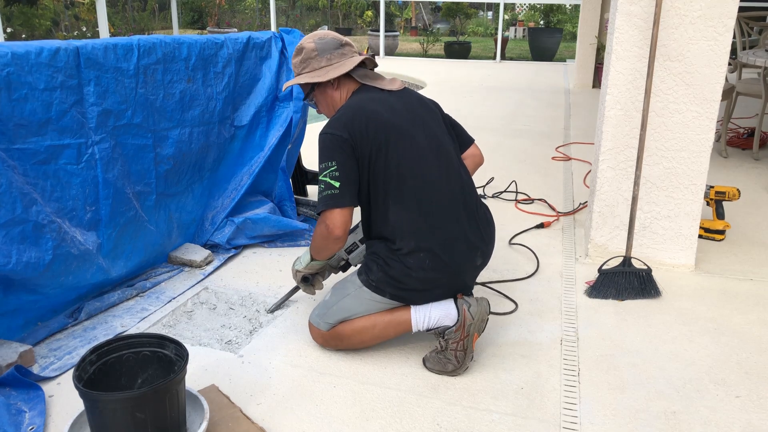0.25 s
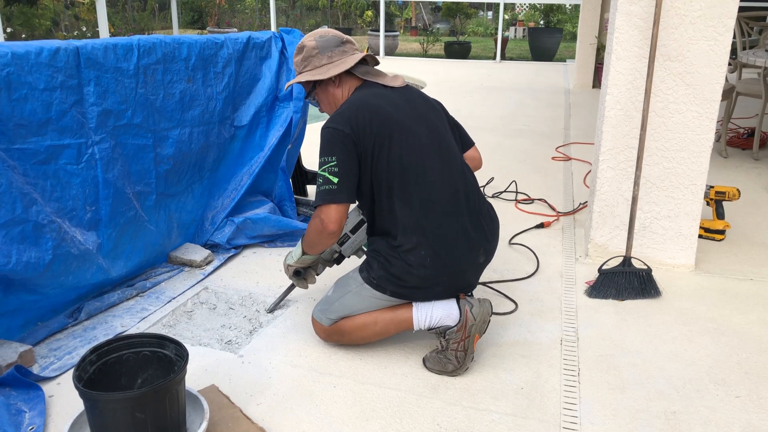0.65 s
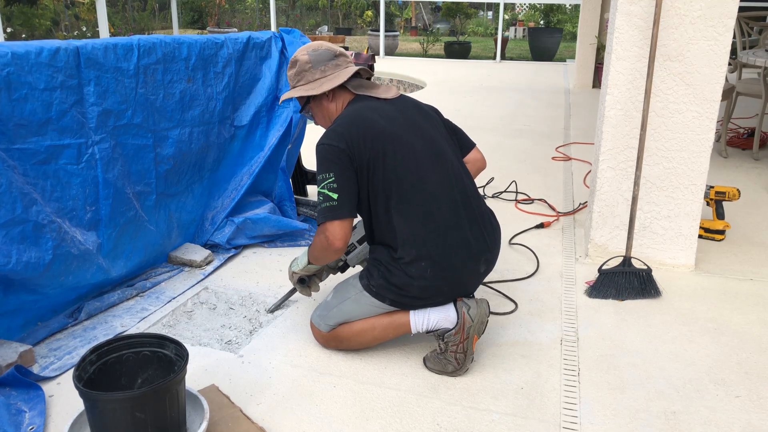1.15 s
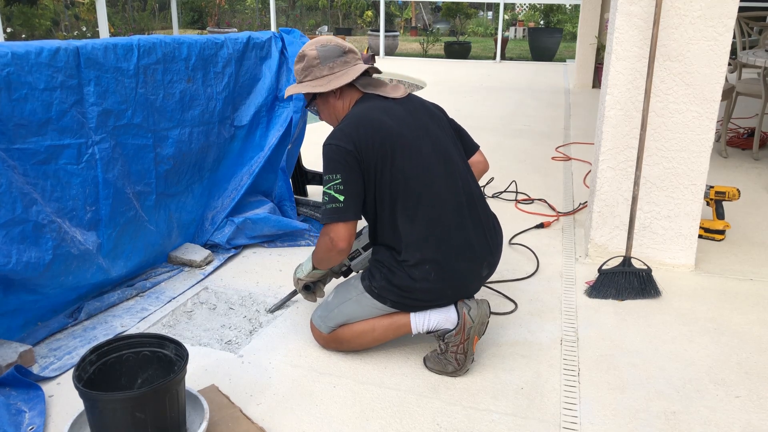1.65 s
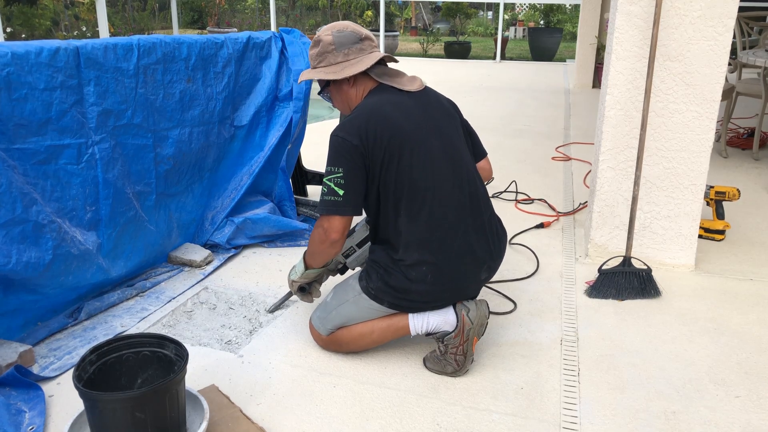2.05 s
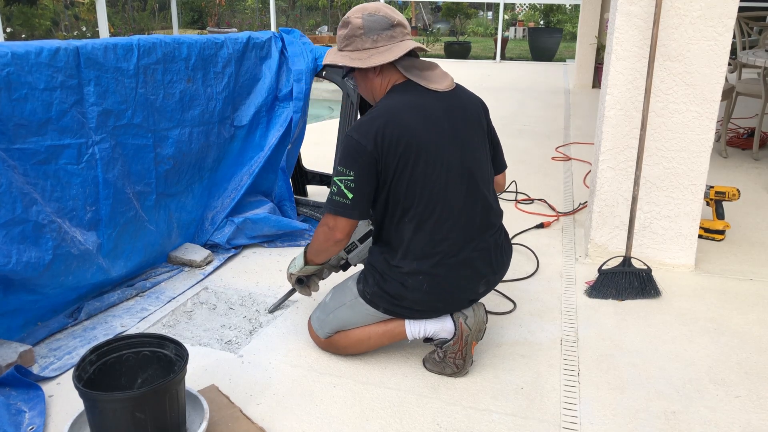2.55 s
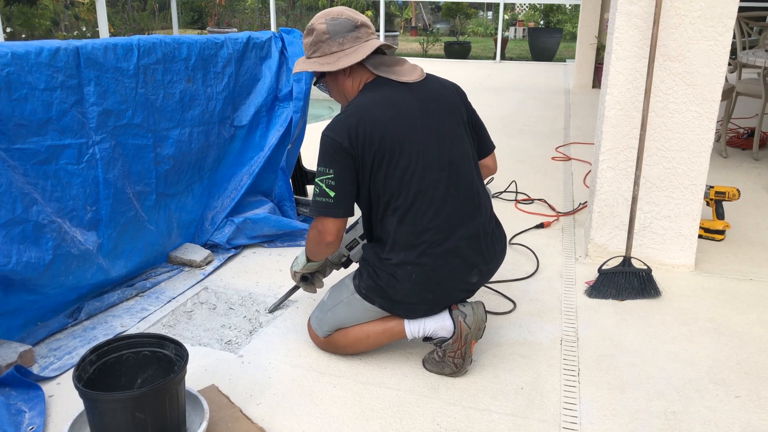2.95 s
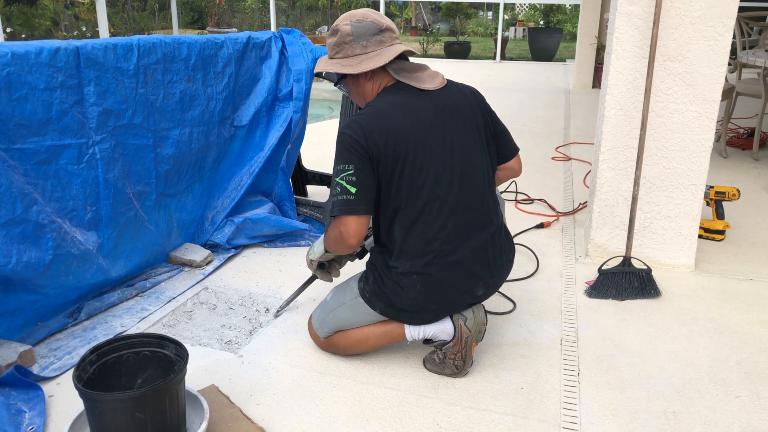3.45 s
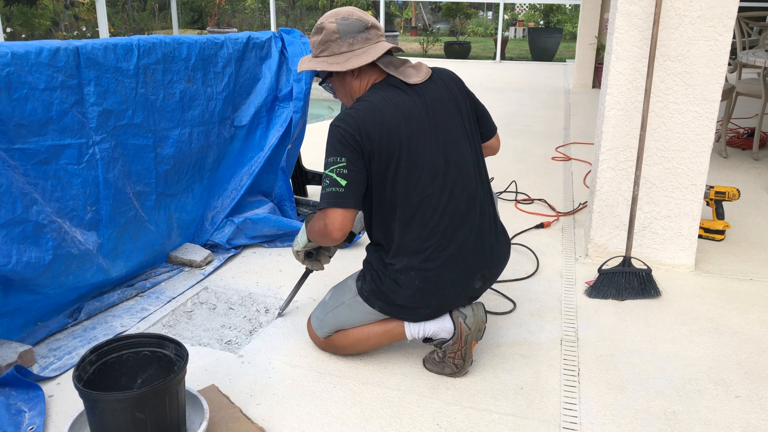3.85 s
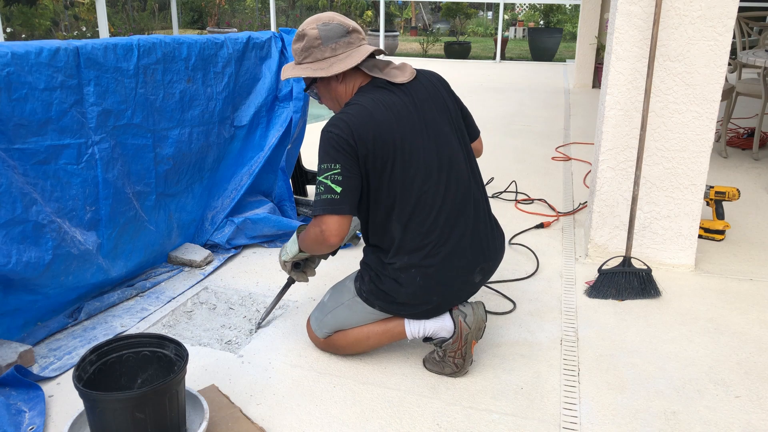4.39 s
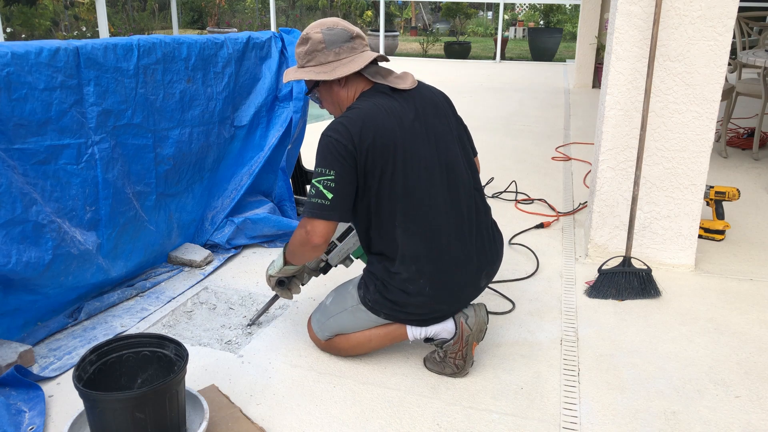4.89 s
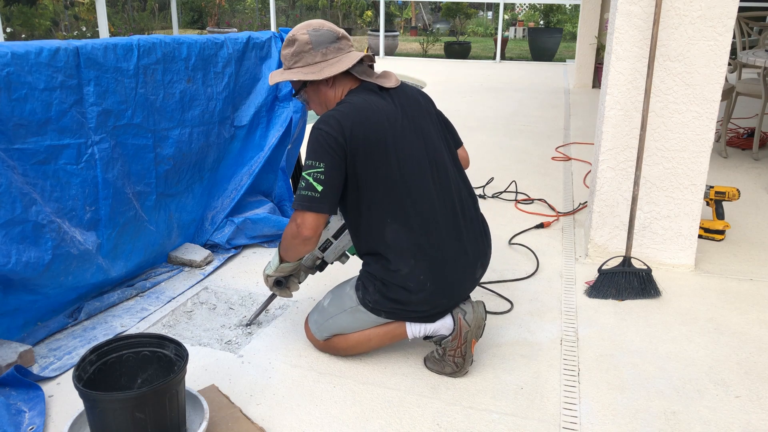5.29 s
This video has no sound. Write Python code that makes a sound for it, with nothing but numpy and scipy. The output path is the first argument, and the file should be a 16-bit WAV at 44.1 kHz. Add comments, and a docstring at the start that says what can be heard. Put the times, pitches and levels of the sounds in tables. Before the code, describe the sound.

Close, mono view of a corded demolition hammer on a roofed pool deck. It is already hammering at full speed, thudding, crunching and ringing, for over two seconds. The trigger is released, the striker clatters briefly, and the motor coasts down with hissing brushes. Steel knocks and scrapes follow, then a click and the hammer runs up again. Short porch echoes, faint yard hush.

```python
"""An electric demolition hammer chisels concrete on a roofed pool deck, 43 blows a second: each blow thuds
through the slab, crunches and cracks the surface and rings the steel, over whirring, growling gears.
The trigger is let go, the tool is lifted, its striker clatters into the catcher and the motor coasts down
with hissing brushes. The chisel knocks and scrapes to a new spot, the trigger clicks, the hammer runs up.
Blows are shaped noise and dying modes, the motor tones and noise that follow its speed; a yard hushes behind."""
import sys
import numpy as np
from scipy import signal
from scipy.fft import rfft, irfft, next_fast_len
from scipy.io import wavfile
from scipy.ndimage import uniform_filter1d

SR = 44100
rng = np.random.default_rng(int(sys.argv[2]) if len(sys.argv) > 2 else 0)


def generate_wav(signal):
    """Clip the signal to [-1, 1] and save it as 16-bit WAV at the path in sys.argv[1]."""
    frames = np.transpose(np.atleast_2d(signal))
    scaled = np.clip(frames, -1, 1) * 32767
    pcm = np.round(scaled).astype(np.int16)
    wavfile.write(sys.argv[1], SR, pcm)


N = 243873
TIME = np.arange(N) / SR

# trigger let go, motor at rest, trigger pulled again [s]
OFF_S, STOP_S, ON_S = 2.264, 3.985, 5.18
# tool lifted clear of the slab, striker held by its catcher [s]
LIFTED_S, CAUGHT_S = 2.395, 2.455
# time of the first blow and between blows at full speed [s]
FIRST_BLOW_S, BLOW_PERIOD_S = 0.0237, 0.023243
# scrape of steel on stone: (frequency [Hz], level [dB])
CLINK_COLOUR = [(350, -61), (600, -11.5), (1960, -6), (2370, 2.5), (2650, -2), (3890, 1), (4710, -6.5),
                (5630, -3), (6920, -14.5), (9240, -7), (10500, -26), (13000, -17), (16000, -43)]


def amp(db):
    """Decibels to gain."""
    return 10 ** (np.asarray(db) / 20)


def unit(x):
    """Scaled to rms 1."""
    return x / np.sqrt(np.mean(x ** 2) + 1e-20)


def per_blow(x):
    """Scaled so that one such sound in every full-speed stroke has rms 1."""
    return x * np.sqrt(BLOW_PERIOD_S * SR / (np.sum(x ** 2) + 1e-20))


def curves(rows, t):
    """The columns of a table at the times t."""
    s, *columns = np.transpose(rows)
    return [np.interp(t, s, c) for c in columns]


def read(points, hz):
    """A table of frequencies read on a log-frequency axis."""
    f, value = np.transpose(points)
    return np.interp(np.log(hz + 1), np.log(f + 1), value)


def add(mix, s, sound):
    """Mixes a sound in at s seconds."""
    start = round(s * SR)
    sound = sound[max(-start, 0):]
    part = mix[max(start, 0):][:len(sound)]
    part += sound[:len(part)]


def causal(gain, size=4096):
    """The quickest (minimum-phase) impulse response that has this gain at each frequency."""
    log_gain = np.log(np.maximum(np.r_[gain, gain[-2:0:-1]], 1e-5))
    return np.fft.ifft(np.exp(np.conj(signal.hilbert(log_gain)))).real[:size]


def colour(x, points):
    """Filters a sound with a spectrum table."""
    size = next_fast_len(len(x) + 512)
    gain = amp(read(points, np.fft.rfftfreq(size, 1 / SR)))
    return irfft(rfft(x, size) * gain, size)[:len(x)]


def ring(modes, t, scatter):
    """Exponentially dying modes, excited a little differently by each hit."""
    hz, db, t60 = np.transpose(modes)[:, :, None]
    turn, spread = rng.random(hz.shape), rng.standard_normal(hz.shape)
    envelope = amp(db + scatter * spread - 60 * t / t60)
    return (envelope * np.sin(2 * np.pi * (hz * t + turn))).sum(0)


def wander(rate):
    """Random drift of rms 1, with so many new values a second."""
    knots = np.arange(0, N / SR + 1, 1 / rate)
    return unit(np.interp(TIME, knots, rng.standard_normal(len(knots))))


def hammer(jolt_lead=0.0054, uneven_db=0.6, shake_db=-7, holder_hz=1750, holder_t60=0.055):
    """Every blow is part the same steel-on-steel impact, part fresh breaking of concrete."""
    # the slab under the chisel: (frequency [Hz], relative width [Hz], level [dB])
    slab_modes = [(172, 22, -9), (215, 36, -2), (310, 30, -9), (360, 60, -4), (516, 45, -6.5),
                  (645, 46, -.5), (790, 90, -5), (946, 50, -.5), (1030, 40, -9), (1170, 110, -12.5)]
    # the tool's housing, jolted just ahead of the impact: (frequency [Hz], relative width [Hz], level [dB])
    housing_modes = [(1510, 45, -1), (1560, 50, -1), (1675, 55, 0)]
    # the steel chisel pressed on the stone: (frequency [Hz], level [dB], t60 [s])
    chisel_modes = [(8860, -10, .03), (9800, 3.5, 0.02), (8970, -23.5, 0.074), (9660, 26.5, 0.044),
                    (15020, -18.5, .05), (15570, -21, .04)]
    # the chisel bouncing free of the slab: (frequency [Hz], level [dB], t60 [s])
    free_chisel_modes = [(9200, -4.5, .035), (9600, -8, 0.21), (15000, -19, .08), (15570, -20.5, .06)]
    # crumbling concrete: (frequency [Hz], level [dB])
    crunch_colour = [(40, -30.5), (110, -17), (200, -5), (450, -7), (1300, -6), (1900, -5), (2200, 1),
                     (2900, -1.5), (3300, 4.5), (3750, -1.5), (4300, -5), (5500, -24.5), (7000, -8.5),
                     (16000, -37.5)]
    # the sharp crack of the surface: (frequency [Hz], level [dB])
    crack_colour = [(100, -10.5), (2500, -19.5), (4500, -4.5), (5500, 1.5), (6500, -2.5), (7200, -4.5),
                    (8500, 2.5), (10000, 2.5), (11800, -0.5), (13000, -3.5), (14000, -14), (14700, -0.5),
                    (15500, -9), (16000, -6.5)]
    # the tool's body shaking as it bounces: (frequency [Hz], level [dB])
    shake_colour = [(20, -43), (45, -23.5), (85, -9.5), (140, 5.5), (250, -2), (450, -15), (900, -8),
                    (2000, -19), (8000, -57)]

    slab = bend(thud(slab_modes, floor_db=-32, smear=.00002))
    housing = thud(housing_modes, floor_db=-30, smear=.0001)
    out = np.zeros(N)
    before = .004  # s of each burst ahead of its impact
    t = np.arange(len(slab)) / SR
    holder = per_blow(amp(-60 * t / holder_t60) * np.sin(2 * np.pi * holder_hz * t))
    contacts = rng.standard_normal((20, 2, len(t)))
    for s, low, mid, high, steel, rattle, clack, tilt in blows():
        s += 1.2e-5 * rng.standard_normal()
        add(out, s - jolt_lead, amp(low) * strike(slab, housing))
        # the tip works into a new contact about three times a second
        spot, share = divmod(abs(s) * 3, 1)
        impact = np.sqrt(1 - share) * contacts[int(spot)] + np.sqrt(share) * contacts[int(spot) + 1]
        crack = [(hz, db + tilt * np.log2(np.clip(hz, 5000, 11000))) for hz, db in crack_colour]
        # crunch and crack: (level [dB], colour, likeness from blow to blow, decay [s])
        layers = (mid, crunch_colour, .76, .0046), (high, crack, .62, .0044)
        for pattern, (db, spectrum, same, decay) in zip(impact, layers):
            grit = same * pattern + np.sqrt(1 - same ** 2) * rng.standard_normal(len(t))
            snap = colour(grit * burst(t - before, decay, rattle), spectrum)
            add(out, s - before, amp(db + uneven_db * rng.standard_normal()) * per_blow(snap))
        if clack is None:
            add(out, s, amp(steel) * per_blow(ring(chisel_modes, t, scatter=2.5)))
        else:  # the tool bounces: the chisel rings free, its holder clacks, the body shakes
            held = np.exp(-np.maximum(s + t - LIFTED_S, 0) / 0.0017) if s < LIFTED_S else 1
            add(out, s, amp(steel) * held * per_blow(ring(free_chisel_modes, t, scatter=1.5)))
            add(out, s, amp(clack) * holder)
            shake = colour(rng.standard_normal(len(t)) * np.exp(-t / 0.039), shake_colour)
            add(out, s, amp(low + shake_db + rattle / 2) * per_blow(shake))
    return out


def blows(ring_uneven_db=3.0, loose_thud_db=-1):
    """Each blow: (s, thud, crunch, crack, ring, chatter, holder clack in dB, crack tilt in dB/octave)."""
    # steady work: (time [s], force [dB], hardness of the stone under the tip [-1 crumbly to 1 hard])
    work = [(0.02, 0.6, -0.3), (0.16, 0.75, 0.23), (0.49, 1, -0.45), (0.54, 0.5, -0.66), (0.81, 0.5, -0.21),
            (1.0, 0.9, -0.8), (1.05, 1.4, -0.13), (1.21, 0.8, -0.56), (1.3, 1, 1), (1.56, 2.5, 0.58),
            (1.58, 0.5, 0.64), (1.7, 3, 0.56), (1.74, 1, 0.57), (2.0, 1, -1.07), (2.26, 0.4, 0.3)]
    # the chisel's ring as it binds and frees itself: (time [s], level [dB])
    ring_level = [(0, -1), (.3, 5), (.55, -6), (.93, -5), (.99, 3.5), (1.15, -6), (1.26, 1), (1.76, -3.5),
                  (1.8, 6.5), (1.98, -7.5), (2.26, 1)]
    # the tool bouncing loosely as it is lifted:
    # (crunch [dB], crack [dB], ring [dB], chatter [dB re the blow], holder clack [dB])
    lifting = (-30, -24.5, -25.5, -12.5, -49.5)
    # the same columns as it runs up
    running_up = (-31.5, -24, -27, -15.5, -37)
    # base levels [dB] of a blow pressed home; the chatter is relative to the blow
    thud_db, crunch_db, crack_db, ring_db, chatter_db = -24, -30.5, -27.5, -34, -19
    # hard stone crumbles less, rings the steel less and tilts the crack upward (per unit of hardness)
    hard_crunch_db, hard_ring_db, hard_tilt, tilt = -3.5, -1, 4, -1  # tilts in dB per octave
    # lifting takes the weight off the slab ever faster
    lift_db = -11
    # a slow crank strikes softer, and much softer below a share of full speed
    slow_db_per_decade, full_blow_speed, weak_db_per_speed = 16, 0.53, 43
    weak_ring = 1.3  # the ring suffers this many times as much from a weak blow

    for s in blow_times(0, OFF_S):
        force, hard = curves(work, s)
        steel = ring_db + curves(ring_level, s)[0] + force + hard_ring_db * hard
        steel += ring_uneven_db * rng.standard_normal()
        crunch = crunch_db + force + hard_crunch_db * hard
        # pressed home, the holder is silent
        yield s, thud_db + force, crunch, crack_db + force, steel, chatter_db, None, tilt + hard_tilt * hard
    spans = (OFF_S, LIFTED_S, lift_db, lifting), (ON_S, TIME[-1], 0, running_up)
    for start, end, fade, (crunch, crack, steel, chatter, clack) in spans:
        for s in blow_times(start, end):
            speed = motor_speed(s)
            weight = fade * ((s - start) / (end - start)) ** 2
            weak = weak_db_per_speed * min(speed - full_blow_speed, 0)
            low = thud_db + loose_thud_db + weight + slow_db_per_decade * np.log10(speed)
            yield (s, low + weak, crunch + weight + weak, crack + weak, steel + weak_ring * weak,
                   chatter + weak, clack + 2 * weak, tilt)


def strike(slab, housing, slab_db=-3.5, housing_db=-10.0):
    """One stroke: the housing's jolt and the slab's thud, never twice quite alike."""
    lag, varied = round(.0027 * SR), .14  # the housing's delay in samples, share of chance
    t = np.arange(len(slab)) / SR
    settling = per_blow(rng.standard_normal(len(t)) * np.exp(-t / .008))
    contact = varied * settling / np.sqrt(BLOW_PERIOD_S * SR)
    contact[0] += 1  # the main push, followed by the tip settling into the stone
    boom = amp(slab_db) * slab + amp(housing_db) * np.pad(housing, (lag, 0))[:len(t)]
    return signal.fftconvolve(boom, contact)[:len(t)]


def thud(modes, floor_db, smear):
    """A body's short boom: resonant peaks over a floor, smeared in time by an all-pass."""
    # overall slope of a struck body: (frequency [Hz], level [dB])
    body_slope = [(20, -26), (43, -8), (86, -8), (130, 2), (170, -2), (215, 0), (1700, 0), (1900, -5),
                  (3000, -6), (6000, -18), (16000, -45)]
    hz = np.fft.rfftfreq(8192, 1 / SR)
    power = sum(amp(2 * db) / (1 + ((hz - f) / (1.215 * width)) ** 2) ** 2.4 for f, width, db in modes)
    boom = causal(np.sqrt(power + amp(2 * floor_db)) * amp(read(body_slope, hz)))
    pole = np.exp(-1 / (smear * SR))
    return per_blow(signal.lfilter([-pole, 1], [1, -pole], boom))


def bend(x, travel=.004, edge=.0033, direct=.85):
    """Bending waves bring the slab's bass later than its treble, and echo from its edge."""
    # travel: seconds at 1 kHz; edge: echo delay in seconds; direct: share that arrives directly
    hz = np.fft.rfftfreq(2 * len(x), 1 / SR)
    echo = np.exp(-2j * np.pi * hz * edge)
    dispersion = np.exp(-4j * np.pi * travel * np.sqrt(1000 * hz))
    way = dispersion * (direct + echo) / (1 + direct * echo)
    return irfft(rfft(x, 2 * len(x)) * way)[:len(x)]


def burst(t, decay, rattle_db, lead=0.0028, latch_db=-5.5, rise=0.00067):
    """Envelope of a blow: a light tick of the striker, the impact, then chatter."""
    tick = amp(latch_db) * np.exp(-abs(t + lead) / .002) * (t > -lead)
    impact = np.exp(-abs(t) / decay) * np.clip(t / rise + .5, 0, 1)
    chatter = amp(rattle_db) * np.exp(-abs(t) / 0.033) * (t > 0)
    return np.sqrt(tick ** 2 + impact ** 2 + chatter ** 2)


def idle_blows():
    """Off the slab, the striker flies into its catcher and rebounds: two bursts of steel noise a stroke."""
    # striker on catcher: (frequency [Hz], level [dB])
    catcher_colour = [(100, -29), (1000, -17), (2800, -6), (3500, -2), (4300, 3), (5200, -2), (5900, -5.5),
                      (9000, -9.5), (12000, -9), (14000, -15.5), (16000, -12)]
    # hit and rebound: (delay [s], level [dB], chatter [dB re the hit])
    hits = (0, -22.5, -28), (.016, -23, 12)
    before = .004  # s of each burst ahead of its impact
    t, out = np.arange(4096) / SR, np.zeros(N)
    for s in blow_times(LIFTED_S, CAUGHT_S):
        for delay, db, rattle in hits:
            clatter = rng.standard_normal(len(t)) * burst(t - before, 0.00183, rattle)
            add(out, s + delay - before, amp(db) * per_blow(colour(clatter, catcher_colour)))
    return out


def judder(db=-33.5, delay=.015, decay=0.015, size=4096):
    """Running up, the tool drops back on the slab between its first full blows: dull noise bursts."""
    # (frequency [Hz], level [dB])
    drop_colour = [(40, -29), (120, 6.5), (1000, -7), (2800, -2), (16000, -29)]
    t, out = np.arange(size) / SR, np.zeros(N)
    for s in blow_times(5.29, 5.48):
        drop = colour(rng.standard_normal(size) * np.exp(-t / decay), drop_colour)
        add(out, s + delay, amp(db) * per_blow(drop))
    return out


def motor_speed(t):
    """Share of full speed: steady, coasting to rest, running up again."""
    # air drag takes a share of the speed within a time constant [s], friction the rest at an even rate
    drag_share, drag_s = .23, .18
    run_up_s = .146  # time constant
    coasting = np.maximum(t - OFF_S, 0)
    friction = np.maximum(1 - coasting / (STOP_S - OFF_S), 0)
    down = (1 - drag_share) * friction + drag_share * np.exp(-coasting / drag_s)
    up = 1 - np.exp(-np.maximum(t - ON_S, 0) / run_up_s)
    return np.maximum(np.where(t < ON_S, down, up), 1e-5)


def crank():
    """Strokes of the piston, counted so that a blow lands on every whole number."""
    first_stroke = .694  # part of a stroke from rest to the first blow
    strokes = np.cumsum(motor_speed(TIME)) / SR / BLOW_PERIOD_S
    restart = strokes[round(ON_S * SR)] + first_stroke
    return strokes - np.where(TIME < ON_S, FIRST_BLOW_S / BLOW_PERIOD_S, restart)


def blow_times(start, end):
    """When the crank fires the striker within a span."""
    times = TIME[:-1][np.diff(np.floor(crank())) > 0]
    return times[(times >= start) & (times < end)]


def motor(locked=0.37, flutter=0.22, squeeze_db=2.0, squeeze_lead=0.22, size=2048):
    """Pinion and fan whine; gears rub partly over the same roughness on each turn; brushes hiss as noise."""
    # pinion, fan and commutator: (multiple of the shaft rate, level [dB])
    tones = [(5, 0), (6, -13), (10, -9), (12, -8), (15, -10)]
    # the whine, before its fall with speed: (time [s], level [dB])
    whine_level = [(.42, -35), (.55, -49), (1.5, -38), (2.3, -39.5)]
    # whir of gears and fan: (frequency [Hz], level [dB])
    whir_colour = [(100, -27.5), (350, 0.5), (600, -10), (900, -0.5), (1500, 0), (2300, -1.5), (3000, 3),
                   (5300, 1.5), (7500, 0.5), (10400, -40), (16000, -83)]
    # hiss of the brushes: (frequency [Hz], level [dB])
    brush_colour = [(200, -47.5), (5000, -19), (7000, -11.5), (8500, -8), (9600, -5.5), (11000, -3),
                    (12200, -2.5), (13500, -12.5), (15500, -15.5)]
    shaft_hz = 649.2  # at full speed
    # the whine dies away further below a share of full speed, by so many dB per share
    whine_db_per_decade, whine_min_speed, whine_drop_db = 54, .52, 130
    # whir at full speed, its fall with speed, and the extra while pulling up from rest
    whir_db, whir_db_per_decade, strain_db = -35.5, 19.5, 2
    # hiss, loudest at one share of full speed, and its change under power
    brush_db, brush_best_speed, brush_db_per_decade, brush_powered_db = -39, 0.91, 8.5, -6

    speed = motor_speed(TIME)
    turns = np.cumsum(shaft_hz * (speed + .0006 * wander(12))) / SR
    whine = np.sqrt(2) * sum(amp(db + 2 * wander(60)) * np.sin(2 * np.pi * order * turns)
                             for order, db in tones)
    # the roughness around the shaft sounds as a stack of orders that glides with the speed
    orders = np.r_[np.zeros(7), np.exp(2j * np.pi * rng.random(30))]
    surface = np.interp(turns % 1, np.linspace(0, 1, size), irfft(orders, size))
    rub = locked * unit(surface) + np.sqrt(1 - locked ** 2) * rng.standard_normal(N)
    # the slower the shaft, the more each turn is heard
    each_turn = flutter * (1 - speed) * np.sin(2 * np.pi * turns)
    pulse = 1 + each_turn + (0.067 + 0.15 * (1 - speed) ** 4) * wander(110)
    # the gears are loaded as they pull up to speed, and as the piston squeezes its air before each blow
    squeeze = squeeze_db * np.cos(2 * np.pi * (crank() + squeeze_lead)) * (TIME < LIFTED_S)
    load = strain_db * (1 - speed) * (TIME > ON_S) + squeeze
    whir = whir_db + whir_db_per_decade * np.log10(speed) + load
    off_best = (speed / brush_best_speed + brush_best_speed / speed) / 2
    hiss = brush_db - brush_db_per_decade * np.log10(off_best)
    hiss = hiss + brush_powered_db * ((TIME < OFF_S) | (TIME > ON_S))
    tone = curves(whine_level, TIME)[0] + whine_db_per_decade * np.log10(speed)
    tone = tone - whine_drop_db * np.maximum(whine_min_speed - speed, 0)
    gears = amp(whir) * unit(case(colour(rub, whir_colour)))
    # in the last turns the brush hiss wavers irregularly in level
    waver_db = 4 * np.exp(-speed / 0.053) * wander(70)
    brushes = amp(hiss + waver_db) * unit(case(colour(rng.standard_normal(N), brush_colour)))
    return (gears + brushes) * pulse + amp(tone) * whine


def case(x, patchy_db=2.6):
    """The motor case rings along with the noise inside it; narrow bands of it swell and fade."""
    # resonances of the case: (frequency [Hz], width [Hz], boost [dB])
    resonances = [(1140, 300, 0), (1870, 270, 4), (2430, 150, 10), (2710, 280, 4.5), (3600, 260, 3.5),
                  (4200, 240, 5.5), (4830, 200, 6.5), (5350, 150, 10.5), (6120, 110, 7), (6630, 200, 7),
                  (9500, 270, 4), (10340, 200, 5), (10400, 270, 0), (11700, 250, -3)]
    hz, _, z = signal.stft(x, SR, nperseg=1024, noverlap=768)
    patches = uniform_filter1d(rng.standard_normal(z.shape), size=4, axis=0)
    patches = unit(uniform_filter1d(patches, size=22, axis=1))
    peaks = sum(db / (1 + (2 * (hz - f) / width) ** 2) for f, width, db in resonances)
    z = z * amp(peaks[:, None] + patchy_db * patches)
    return signal.istft(z, SR, nperseg=1024, noverlap=768)[1][:N]


def growl(db=-36.0, size=1024):
    """The loaded gears grind over much the same teeth on every stroke: slowly changing looped noise."""
    # gears under load: (frequency [Hz], level [dB])
    growl_colour = [(100, -32), (400, -12), (700, -2.5), (1000, -1.5), (1330, -11), (1550, -1.5),
                    (2000, 0.5), (3300, -7), (4000, -11.5), (10000, -5.5), (16000, -15)]
    stroke = crank() % 1
    first, second = (np.interp(stroke, np.arange(size) / size, row) for row in rng.standard_normal((2, size)))
    load = np.clip((LIFTED_S - TIME) / 0.11, 0, 1) + motor_speed(TIME) * (TIME > ON_S)
    grind = np.cos(2 * TIME) * first + np.sin(2 * TIME) * second
    return amp(db) * load * unit(colour(grind, growl_colour))


def knocks(grain=0.74, spot_db=-0.8, size=16384):
    """Tip contacts and a last trigger click: a noise scrape, a dull bump, one bounce and ringing modes."""
    # the chisel set down and nudged; the last row is the trigger switch clicking:
    # (time [s], clink [dB], dull knock [dB], ring [dB], scrape decay [s], brightness [dB per octave])
    contacts = [(3.565, -47, -50, -63, 0.013, -3), (3.855, -53, -65, -70, 0.0061, -5.5),
                (4.064, -62, -59.5, -60, 0.0081, 2), (4.126, -44.5, -52.5, -49, 0.0065, 0),
                (4.231, -51.5, -52, -68, 0.0048, 1), (4.34, -54.5, -55.5, -66, 0.0046, -0.5),
                (4.494, -44.5, -68, -53, 0.0031, -1.5), (4.644, -46.5, -51, -60, 0.0056, 0),
                (4.687, -37.5, -57, -61, .007, 4), (4.697, -42, -46.5, -56, 0.0061, 5.5),
                (4.905, -63, -64, -84, .004, -7), (4.96, -48, -49, -76, 0.018, -1),
                (5.186, -49.5, -64, -67, 0.0033, 0)]
    # the chisel swinging loose in its holder: (frequency [Hz], level [dB], t60 [s])
    loose_modes = [(1308, -20, .12), (2280, -8, .12), (2368, 2, .17), (2440, -8, .1), (3025, -9, .1),
                   (3640, -9, .07), (4220, -4, .18), (5265, -11, .08), (5658, -14, .1), (8900, -3, .11),
                   (9400, -9, .08), (10400, -11, .12), (11500, -13, .1), (12700, -12, .12)]
    # dull bump on the slab: (frequency [Hz], level [dB])
    knock_colour = [(20, -45), (45, -28), (120, -4), (230, 0), (450, -4), (900, -7), (2000, -20),
                    (8000, -50)]
    # the bounce: delay, and its clink and knock in dB re the first dull knock
    bounce_s, bounce_clink_db, bounce_knock_db = 0.018, -17.5, -12

    t, out = np.arange(size) / SR, np.zeros(N)
    for s, clink_db, knock_db, ring_db, length, bright in contacts:
        bounce = s + bounce_s, knock_db + bounce_clink_db, knock_db + bounce_knock_db
        for at, clink, knock in (s, clink_db, knock_db), bounce:
            grit, bump, clumps = rng.standard_normal((3, size))
            fade = np.exp(grain * unit(uniform_filter1d(clumps, 40)) - t / length)
            scrape = grit * fade * np.minimum(t / 0.0035 + 0.1, 1)
            # every contact has its own colour
            spot = [(hz, db + bright * np.log2(hz / 3000) + spot_db * rng.standard_normal())
                    for hz, db in CLINK_COLOUR]
            add(out, at, amp(clink) * per_blow(colour(scrape, spot)))
            add(out, at, amp(knock) * per_blow(colour(bump * np.exp(-t / 0.0067), knock_colour)))
        # a longer contact rings the low modes, a brief tap the high ones
        modes = [(hz, db - 5 * np.log2(np.minimum(hz, 9000) / 4000) * np.log2(length / .006), t60)
                 for hz, db, t60 in loose_modes]
        add(out, s, amp(ring_db) * per_blow(ring(modes, t, scatter=1.7)))
    return out


def drag(grains_per_s=480, grain_s=0.0043, size=1024):
    """The tip is dragged to its new spot, grinding loose grit: random grains of decaying noise."""
    # the drag over grit: (start [s], end [s], level [dB])
    start, end, db = (3.8, 4.39, -58.5)
    span = (TIME > start) & (TIME < end)
    grains = rng.exponential(1, N) * (rng.random(N) < grains_per_s / SR) * span
    level = signal.lfilter(np.exp(-np.arange(size) / (grain_s * SR)), 1, grains)
    grinding = unit(colour(level * rng.standard_normal(N), CLINK_COLOUR))
    return amp(db) * np.sqrt(span.mean()) * grinding


def porch(x, size=24000):
    """Scattered echoes from deck, pillars and roof; the middle of the spectrum lingers longest."""
    # decay of the porch: (frequency [Hz], t60 [s])
    decay = [(100, 0.11), (1000, 0.47), (4000, 0.12), (9000, 0.12), (16000, 0.042)]
    taps = rng.standard_normal(size) * (rng.random(size) < .08) * (np.arange(size) > .006 * SR)
    hz, t, z = signal.stft(taps, SR, nperseg=256)
    tail = signal.istft(z * amp(-60 * t / read(decay, hz)[:, None]), SR, nperseg=256)[1]
    return signal.fftconvolve(x, tail / np.linalg.norm(tail))[:N]


def yard(db=-59.5):
    """The hush of the yard: steady noise, mostly low."""
    # (frequency [Hz], level [dB])
    yard_colour = [(15, -49.5), (25, -12), (139, 0.5), (191, -5), (237, -8.5), (309, -10), (462, -17),
                   (673, -15.5), (1390, -20.5), (3630, -25), (8780, -35), (10000, -46), (15000, -67.5)]
    return amp(db) * unit(colour(rng.standard_normal(N), yard_colour))


def scene(hammer_wet_db=-17, knock_wet_db=-8, motor_wet_db=-14):
    """Tool and chisel under the porch roof, over the hush of the yard."""
    pounding = hammer() + idle_blows() + judder()
    running = motor() + growl()
    taps = knocks() + drag()
    echo = porch(amp(hammer_wet_db) * pounding + amp(knock_wet_db) * taps + amp(motor_wet_db) * running)
    return (pounding + taps + running + echo + yard())[None]


def record(dry, ceiling=.55, edge_hz=15850):
    """The loudest peaks are rounded off below a ceiling; then a steep low-pass ends the treble."""
    rounded = dry / (1 + (dry / ceiling) ** 4) ** (1 / 4)
    low_pass = signal.firwin(511, edge_hz, window=("kaiser", 9), fs=SR)
    return signal.oaconvolve(rounded, low_pass[None], "same")


dry = scene()
out = record(dry)
generate_wav(out)
```